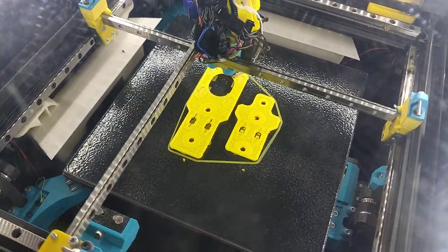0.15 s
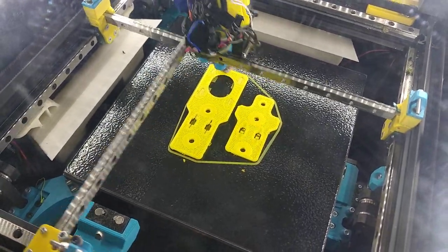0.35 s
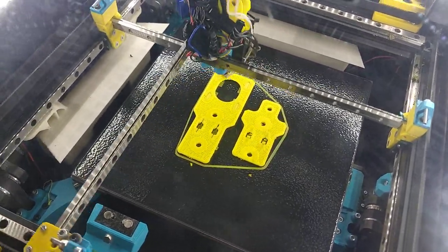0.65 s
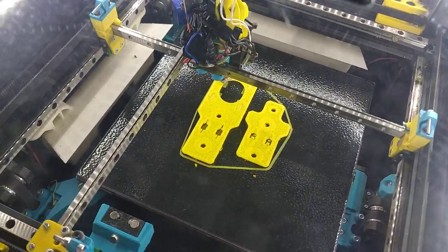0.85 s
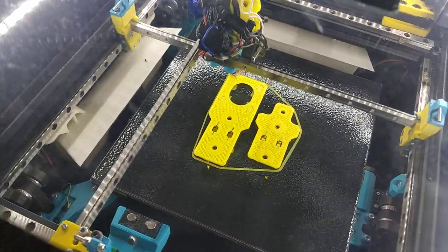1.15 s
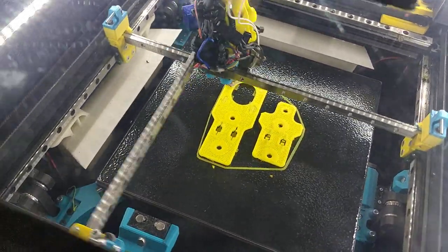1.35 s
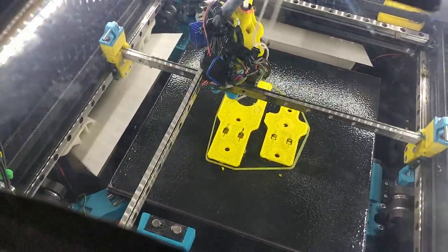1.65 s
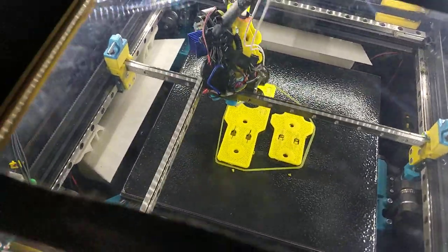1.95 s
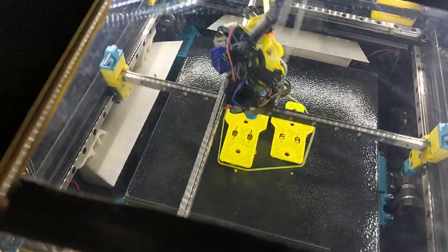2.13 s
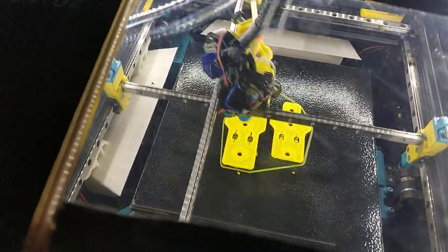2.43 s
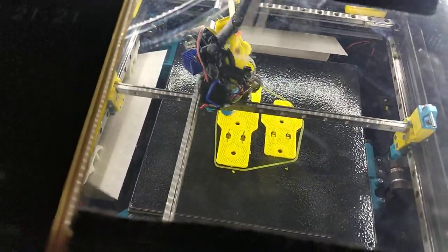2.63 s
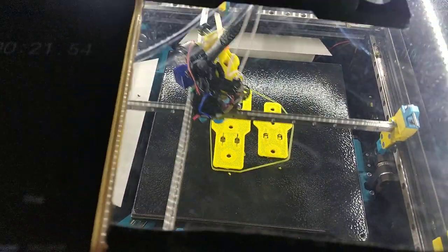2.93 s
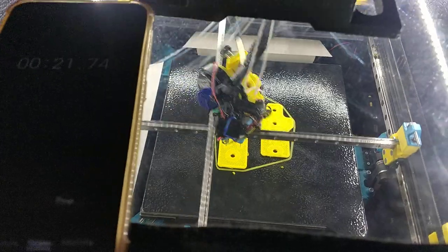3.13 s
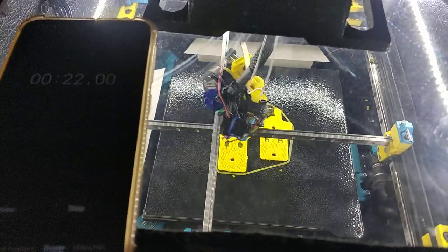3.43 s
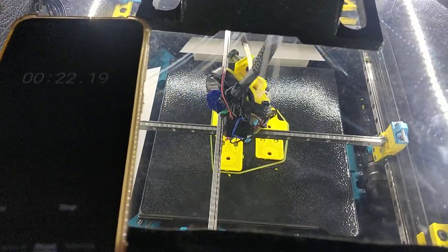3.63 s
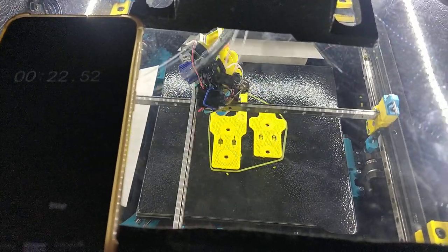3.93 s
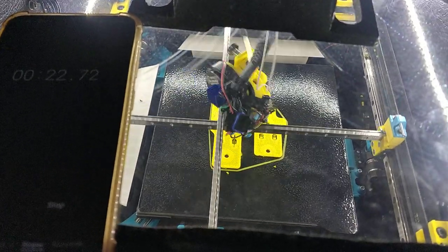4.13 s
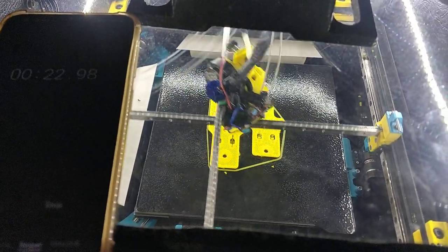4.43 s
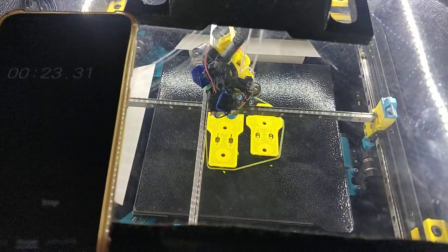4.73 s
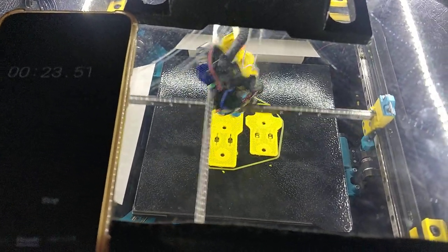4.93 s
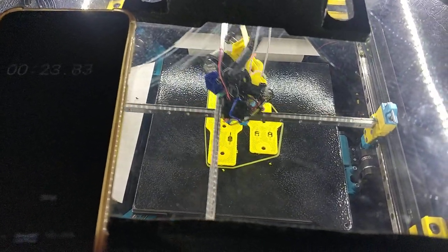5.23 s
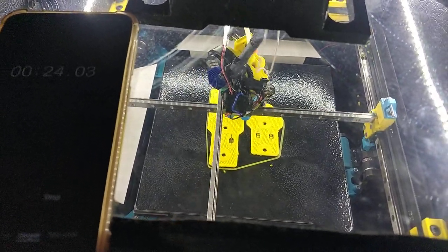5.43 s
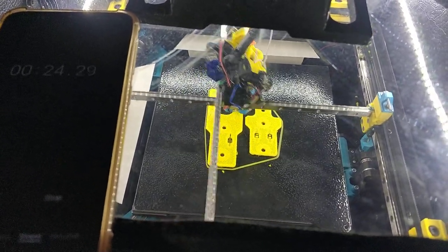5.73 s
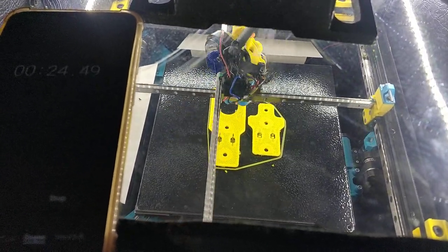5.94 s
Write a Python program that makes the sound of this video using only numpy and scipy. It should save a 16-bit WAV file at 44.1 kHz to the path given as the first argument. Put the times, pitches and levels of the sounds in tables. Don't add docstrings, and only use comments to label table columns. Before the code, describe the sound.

A fast 3D printer up close: low wavering frame hum, rapid thudding gantry jerks, drumming panel, faint hiss and ticks, ending in harder plastic raps.

```python
import sys
import numpy as np
from scipy import signal
from scipy.fft import rfft, irfft
from scipy.io import wavfile
from scipy.ndimage import uniform_filter1d

SR = 44100
rng = np.random.default_rng(int(sys.argv[2]) if len(sys.argv) > 2 else 0)


def boost(x):
    u = np.asarray(x, float) / 20
    return 10 ** u


def waveform_to_disk(signal):
    frames = np.transpose(np.atleast_2d(signal))
    scaled = np.clip(frames, -1, 1) * 32767
    samples = np.round(scaled).astype(np.int16)
    wavfile.write(sys.argv[1], SR, samples)


N = 268128
TIME_S = np.arange(N) / SR

# [peak_s, level_db]
FRAME_ROCKS = [(-.04, -30), (.12, -38), (.25, -38), (.36, -33.5), (.48, -31.5), (.69, -33), (.8, -32),
               (.91, -34), (1.03, -35), (1.14, -30.5), (1.25, -34), (1.44, -30.5), (1.55, -29),
               (1.76, -39.5), (1.95, -28.5), (2.2, -38.5), (2.34, -30.5), (2.62, -35.5), (2.7, -48),
               (2.91, -37.5), (3.05, -37), (3.14, -36), (3.45, -35), (3.72, -37), (3.88, -38), (4.0, -40.5),
               (4.25, -40.5), (4.4, -44), (4.76, -40.5), (4.94, -41), (5.05, -36), (5.2, -35.5),
               (5.4, -35.5), (5.57, -31.5), (5.66, -48), (5.8, -38), (5.97, -35.5), (6.05, -36)]
# [time_s, pitch_hz]
FRAME_PITCH_CURVE = [(0.0, 54.25), (0.52, 55.77), (0.68, 56.13), (1.22, 56.4), (1.4, 53.5), (1.6, 55.4),
                     (1.72, 53.3), (1.86, 56.5), (2.0, 55.56), (2.7, 56.4), (2.85, 59.25), (3.2, 59.3),
                     (3.4, 55.1), (3.61, 57.35), (5.15, 56.8), (5.38, 51.83), (5.57, 51.4), (5.71, 54.2),
                     (6.08, 54.6)]
# [time_s, effort_db]
HEAD_TRAVEL = [(0.0, 0), (.57, 1), (.63, -4), (.76, -1.5), (.9, -1), (1.56, 2), (1.83, -1), (2.08, 1),
               (2.6, 0.5), (3.6, -2.5), (3.89, 1), (4.06, -5), (4.3, -0.5), (4.66, -2), (5.21, 0.5),
               (5.28, -4), (5.59, -1), (6.08, 3)]
# [frequency_hz, density_db_per_hz]
AIR_SPECTRUM = [(15, -33), (25, -9), (57, 2), (80, -17), (120, -23), (165, -7.5), (234, -16), (324, -6),
                (402, -8.5), (1000, -25), (1280, -27.5), (5070, -41.5), (7800, -63.5), (9170, -61.5),
                (12300, -42), (15700, -98)]
# [frequency_hz, level_db]
BLADE_LINES = [(266, -57), (440, -62), (500, -60), (988, -60.5), (1525, -81), (1665, -70), (3820, -80)]
MAINS_BUZZ = {11: -67, 12: -72, 13: -74, 20: -80, 21: -77, 22: -78, 130: -90, 135: -88, 137: -91}
# [start_s, peak_db, pitch_hz]
PANEL_SHOVES = [(0.107, -58, 318), (0.204, -50, 320), (0.362, -36.5, 342), (0.408, -31.5, 317),
                (0.518, -33, 328), (0.684, -27.5, 311), (0.756, -33, 330), (1.017, -30.5, 337),
                (1.094, -28, 303.5), (1.224, -40, 310), (1.277, -21, 314), (1.37, -33, 333),
                (1.412, -26, 319), (1.48, -36, 328.5), (1.536, -49, 342), (1.578, -30, 330),
                (1.756, -30, 326), (1.803, -28.5, 327.6), (1.877, -24.5, 316.7), (1.935, -28.5, 296),
                (1.979, -45, 328), (2.044, -25, 335), (2.112, -21.5, 325), (2.325, -23.5, 321.7),
                (2.419, -36, 333), (2.541, -38, 316.5), (2.734, -29.5, 340), (2.821, -27.5, 324.4),
                (2.94, -43, 304.6), (3.052, -33, 354), (3.125, -29.5, 316), (3.275, -32.5, 320.5),
                (3.414, -27.5, 310.5), (3.475, -31.5, 310), (3.627, -34, 340), (3.793, -25.5, 327.3),
                (4.081, -45, 342.5), (4.372, -31.5, 332), (4.632, -30, 321), (4.708, -25.5, 316),
                (4.794, -28.5, 326), (4.849, -31, 326), (4.938, -24.5, 326), (5.004, -27, 322.5),
                (5.088, -53, 316), (5.175, -39, 303), (5.216, -60, 332.6), (5.317, -28, 341.3),
                (5.415, -28, 304), (5.492, -30, 309), (5.588, -33, 308), (5.645, -29.5, 336.4),
                (5.844, -27, 325), (5.971, -28.5, 305)]
# [start_s, peak_db, pitch_hz, lower_part_db]
BALL_TICKS = [(0.074, -41, 11400, -20), (1.003, -35.5, 11770, -18), (1.25, -39.5, 12400, -2),
              (1.6341, -55, 13400, -5), (1.896, -41, 12400, 5), (1.9813, -40, 13600, -9),
              (2.326, -41, 13600, -18), (2.4192, -38, 12900, -18), (2.6376, -47, 13500, -7),
              (2.8219, -41, 13400, -18), (3.312, -42.5, 10700, -5), (3.4188, -35.5, 12200, 20.5),
              (5.234, -43, 11100, 25), (5.5949, -44, 12500, 23)]
# [start_s, peak_db, pitch_hz]
RAIL_SCRAPES = [(0.1087, -48, 5040), (0.14, -46, 5130), (0.2583, -54, 5030), (0.4554, -48, 5000),
                (0.5571, -49, 5220), (0.7457, -48, 4620), (0.7696, -49.5, 5250), (0.8614, -53, 5180),
                (0.9525, -50, 5040), (1.1104, -54, 5330), (1.2191, -52, 5200), (1.4373, -63, 4740),
                (2.1031, -48, 4560), (2.4204, -46, 4380), (2.483, -59, 4750), (2.611, -55, 4480),
                (2.6913, -50, 4610), (2.833, -50, 4600), (3.676, -50, 4470), (3.8018, -58, 4950),
                (3.8571, -56, 4840), (5.0923, -51, 5400), (5.1864, -47, 4740), (5.2129, -49, 4430),
                (5.595, -49, 5350), (5.7937, -51, 4420), (5.828, -45, 4610), (6.0169, -46, 4710)]
# [start_s, peak_db]
SOFT_KNOCKS = [(.132, -40), (.366, -39), (.461, -41), (.493, -42), (.58, -38), (.788, -57), (1.285, -41),
               (1.336, -44), (1.439, -43), (1.491, -51), (1.554, -39), (1.611, -42), (1.749, -46),
               (1.925, -44), (2.01, -37.5), (2.069, -41), (2.105, -42), (2.185, -41), (2.287, -42),
               (2.341, -36.5), (2.415, -56), (2.538, -50), (2.643, -42), (2.819, -41), (2.906, -35.5),
               (3.075, -37.5), (3.164, -38.5), (3.181, -45), (3.199, -46), (3.396, -34.5), (3.425, -36),
               (3.446, -49), (3.472, -41), (3.487, -32), (3.691, -43), (3.828, -51), (3.888, -39),
               (4.23, -40), (4.287, -41), (4.413, -51), (4.716, -37.5), (4.755, -38), (4.96, -39),
               (5.031, -42), (5.057, -55), (5.167, -36.5), (5.642, -38), (5.807, -49)]
# [start_s, peak_db]
HARD_RAPS = [(5.41, -38), (5.444, -38), (5.486, -50), (5.51, -36), (5.543, -31.5), (5.571, -45),
             (5.599, -29), (5.821, -33), (5.8613, -38), (5.918, -35), (5.932, -33), (5.971, -35),
             (6.009, -35.5), (6.028, -32.5), (6.041, -34)]
# [frequency_hz, level_db, t60_s]
DULL_MODES = [(635, 14, 0.015), (792, 15.5, 0.012), (957, -4.5, 0.078)]
# [frequency_hz, level_db, t60_s]
BRIGHT_MODES = [(1050, 10, 0.014), (1645, 3.5, 0.021), (1504, 0.5, 0.021), (2800, -10, 0.014)]
# [start_s, peak_db, pitch_hz]
BEAM_JERKS = [(0.289, -36, 172), (.5, -33, 182), (0.579, -34, 174), (0.714, -29, 160), (0.787, -22, 175.3),
              (0.826, -29, 149), (1.006, -30, 190), (1.044, -31, 172), (1.084, -38, 171),
              (1.222, -25.5, 186), (1.369, -42, 180.2), (1.444, -25, 186.4), (1.538, -23, 176.6),
              (1.601, -39, 197.6), (1.646, -29, 201), (1.804, -29, 178), (1.903, -23, 173),
              (1.979, -20, 195), (2.017, -15.5, 188.4), (2.073, -17, 187), (2.348, -18.5, 180),
              (2.465, -31.5, 173.4), (2.536, -33, 182.4), (2.594, -25.5, 198), (2.649, -21.5, 186.4),
              (2.865, -32, 180), (2.912, -22, 188.3), (2.98, -35, 173), (3.083, -20, 185),
              (3.169, -19, 187.6), (3.314, -31, 193), (3.405, -22.5, 181.9), (3.43, -21, 182.3),
              (3.483, -19, 185), (3.694, -28.5, 199.6), (3.771, -30, 186), (3.89, -25.5, 184.6),
              (4.152, -34, 158), (4.27, -30.5, 190), (4.762, -25.5, 193), (4.965, -27.5, 192.5),
              (5.061, -29, 193), (5.12, -29.5, 203), (5.172, -20.5, 187.3), (5.316, -34, 188),
              (5.387, -25, 204.5), (5.464, -27, 181.5), (5.524, -28, 166.5), (5.601, -25, 192),
              (5.649, -23.5, 183), (5.741, -33, 184.6), (5.806, -27, 188), (5.863, -30, 183),
              (5.91, -28.5, 185.4), (5.99, -32, 172.6)]
# [pitch_ratio, level_db, t60_s]
BEAM_PAIR = [(.83, -8, 0.084), (1.17, -12, 0.091)]
# [start_s, peak_db, pitch_hz]
LINK_CLACKS = [(1.2174, -44, 3660), (1.2727, -44.5, 3870), (1.852, -48, 3670), (1.8657, -44, 3376),
               (1.8968, -38, 3410), (1.921, -42, 3370), (1.949, -44, 3680), (2.56, -46, 3810),
               (2.6088, -45.5, 3360), (2.822, -44, 3760), (3.1934, -51, 3216), (3.674, -44, 3320),
               (3.8551, -48, 3880), (5.0913, -57, 4050), (5.1863, -47, 3390), (5.6325, -42.5, 3950),
               (5.8262, -48, 3280), (5.932, -46, 3000), (6.0284, -45, 2997), (5.919, -46, 2700),
               (6.042, -48, 2800)]
# [frequency_hz, likeness_0_to_1]
PORT_LIKENESS = [(60, 0.98), (130, 0.95), (290, 0.91), (640, 0.68), (1400, 0), (3000, 0)]
# [frequency_hz, left_minus_right_db]
PORT_LEAN = [(60, 2.5), (200, .1), (380, 1.5), (700, .1), (4400, -1.1), (8100, .6), (10000, 5), (13000, 11)]

ROCK_RISE_S, ROCK_T60_S, ROCK_REST_DB = 0.053, 0.85, -52.5
LATE_ROCK = (5.89, -36.5)
SWAY_HZ, SWAY_DB = 46, -8
BUZZ_DB, BUZZ_SLOPE = -45, 1.22
AIR_DB, MAINS_HZ = -41.5, 100
BLADE_FADE_DB_S = 1.1
BELT_DB, RATTLE_DB, RAIL_DB = -50, -63.5, -70.5
RATTLE_SLOPE, RAIL_SLOPE = 1, 0.65
HEAT_DB_S, HEAT_S = 2.5, 4.72
JOLT_DB, JOLT_T60_S = 5, 0.076
PANEL_HZ, RAP_PANEL_DB = 333, -4
TICK_T60_S = 0.052
SNAP_S, SNAP_DB = 5.0283, -34
SCRAPE_T60_S, SCRAPE_DB = 0.11, -4
SOFT_BRIGHT_DB, HARD_BRIGHT_DB = -35, 8
SOFT_BRIGHT_SLOPE, HARD_BRIGHT_SLOPE = -0.51, -0.41
CRACK_DB, CRACK_T60_S = -15, 0.022
CONTACT_S = .0006
POP_S, POP_DB, POP_HZ = .2266, -12.5, 5.0
JERK_UPPER_DB = -7


def on_log(table, hz):
    f, v = np.transpose(table)
    return np.interp(np.log(np.maximum(hz, 1)), np.log(f), v)


def on_time(table):
    s, value = np.transpose(table)
    return np.interp(TIME_S, s, value)


def walk(rate):
    k = int(SR / rate)
    held = np.repeat(rng.standard_normal(N // 50), k)[:N]
    return 1.287 * uniform_filter1d(uniform_filter1d(held, k), k)


def hiss(hz, octaves):
    f = np.maximum(np.arange(N // 2 + 1) * SR / N, 1)
    bell = np.exp(-(np.log2(f / hz) / octaves) ** 4)
    mid, side = irfft(rfft(rng.standard_normal((2, N))) * bell, N)
    alike = np.clip(on_log(PORT_LIKENESS, f), 0, 1)
    mid = irfft(rfft(mid) * np.sqrt(1 + alike), N)
    side = irfft(rfft(side) * np.sqrt(1 - alike), N)
    both = np.array([mid + side, mid - side])
    return both / np.sqrt(np.mean(both.mean(axis=0) ** 2))


def tone(hz, db):
    turns = np.cumsum(hz + np.zeros(N)) / SR + rng.random()
    return np.sqrt(2) * boost(db) * np.sin(2 * np.pi * turns)


def decay(t, t60):
    return np.exp(-np.log(1000) * t / t60)


def ring(hz, t60, rise=0.00062):
    t = np.arange(int(.4 * SR)) / SR
    return (1 - np.exp(-t / rise)) * decay(t, t60) * np.sin(2 * np.pi * hz * t)


def band(x, order, low_hz, high_hz):
    return signal.sosfilt(signal.butter(order, [low_hz, high_hz], "band", fs=SR, output="sos"), x)


def add(out, s, sound, pan_db=0., lag=0):
    for side, sign in enumerate((1, -1)):
        i = max(int(s * SR) + side * lag, 0)
        n = min(len(sound), N - i)
        out[side, i:i + n] += sound[:n] * boost(sign * pan_db / 2)


def frame():
    hz = on_time(FRAME_PITCH_CURVE)
    power = boost(2 * ROCK_REST_DB)
    for s, db in [*FRAME_ROCKS, LATE_ROCK]:
        t = TIME_S - s
        power = power + boost(2 * np.where(t < 0, db + 20 * t / ROCK_RISE_S, db - 60 * t / ROCK_T60_S))
    db = 10 * np.log10(power)
    line = tone(hz * (1 + 0.013 * walk(20)), db)
    skirt = boost(db - 9) * hiss(42, 0.33)
    sway = tone(SWAY_HZ * (1 + 0.029 * walk(10)), db + SWAY_DB + 2.2 * walk(4.25))
    hand = boost(db - 10.0) * hiss(54, 0.13)[0] * np.array([[1], [-1]])
    slow_db = uniform_filter1d(db, size=SR // 4)
    buzz = boost(BUZZ_DB + BUZZ_SLOPE * (slow_db + 36.0)) * hiss(116.3, 0.44)
    return line + skirt + sway + hand + buzz


def chamber():
    out = 0
    for hz in 30 * 2 ** np.arange(0, 9.1, .5):
        band_db = on_log(AIR_SPECTRUM, hz) + 10 * np.log10(hz)
        out = out + boost(band_db + 1.98 * walk(9.9)) * hiss(hz, 0.32)
    out = out * boost(AIR_DB) / np.sqrt(np.mean(out ** 2))
    for hz, db in BLADE_LINES:
        fade_db = (hz < 1000) * BLADE_FADE_DB_S * (TIME_S - 2.5)
        out = out + tone(hz * (1 + 0.003136 * walk(4)), db + 0.27 * walk(4.76) - fade_db)
    for k, db in MAINS_BUZZ.items():
        out = out + tone(k * MAINS_HZ, db + 0.28 * walk(1.1))
    return out


def jolt():
    kicks = np.zeros(N)
    for s, db, _ in BEAM_JERKS:
        kicks[int(s * SR)] = boost(0.64 * (db + 19.5))
    return signal.lfilter([1], [1, -decay(1 / SR, JOLT_T60_S)], kicks)


def travel():
    effort_db = on_time(HEAD_TRAVEL)
    jolt_db = JOLT_DB * jolt()
    shake_db = 1.1 * walk(90) + 1.02 * walk(14)
    heat_db = HEAT_DB_S * np.maximum(TIME_S - HEAT_S, 0)
    belts = boost(4.5) * hiss(173.0, 0.36) + boost(6.5) * hiss(231, 0.75)
    belts = belts + hiss(576, 0.62) + boost(-4.5) * hiss(903, 0.44)
    belts = belts * boost(BELT_DB + effort_db + 0.78 * jolt_db)
    rattle = hiss(2640, 0.99) + boost(-5.5) * hiss(5010, 0.2) + boost(-1.0) * hiss(1310, 0.5)
    rattle = rattle * boost(RATTLE_DB + RATTLE_SLOPE * effort_db + shake_db + 0.4 * jolt_db)
    rail = hiss(14800, 0.47) + boost(-4) * hiss(6320, 0.44)
    rail = rail * boost(RAIL_DB + RAIL_SLOPE * effort_db + heat_db + shake_db + jolt_db)
    return belts + rattle + boost(4.0) * rail


def panel():
    out = boost(-47.0 + 3.8 * on_time(HEAD_TRAVEL) + 0.21 * walk(3.5)) * hiss(329.3, 0.072)
    raps = [(s, db + RAP_PANEL_DB, PANEL_HZ) for s, db in HARD_RAPS]
    for s, db, hz in [*PANEL_SHOVES, *raps]:
        add(out, s - .006, boost(db + 7.0) * ring(hz, 0.17, 0.03), .3)
    return out * boost(walk(70))


def ticks():
    out = np.zeros((2, N))
    t = np.arange(3000) / SR
    shape = (1 - np.exp(-t / 0.0024)) * decay(t, TICK_T60_S)
    for s, db, hz, low_db in BALL_TICKS:
        grit = rng.standard_normal(len(t))
        wide = 0.085 + 0.0044 * max(low_db, 0)
        high = band(grit, 2, hz * (1 - wide), min(hz * (1 + wide), 15500))
        low = boost(low_db - 22) * band(grit, 2, 4900, 9600)
        add(out, s, boost(db) * (high + low) * shape, 2.5, lag=9)
    snap = ring(14200, 0.0033, .0001) + 0.73 * ring(12500, .003, .0001)
    add(out, SNAP_S, boost(SNAP_DB + 2) * snap)
    add(out, SNAP_S + .0018, boost(SNAP_DB - 10) * snap)
    return out


def scrapes():
    out = np.zeros((2, N))
    t = np.arange(3000) / SR
    shape = (1 - np.exp(-t / 0.0018)) * decay(t, SCRAPE_T60_S)
    for s, db, hz in RAIL_SCRAPES:
        puff = band(rng.standard_normal((2, len(t))), 2, 0.888 * hz, 1.12 * hz) * shape
        i = int(s * SR)
        n = min(len(t), N - i)
        out[:, i:i + n] += boost(db + SCRAPE_DB) * puff[:, :n] / np.abs(puff.mean(axis=0)).max()
    return out


def knocks(blows, bright_db, slope):
    out = np.zeros((2, N))
    fade = decay(np.arange(900) / SR, CRACK_T60_S)
    for s, db in blows:
        detune = 1 + .025 * rng.standard_normal(7)
        crack = band(rng.standard_normal(900), 3, 700, 2000) * fade
        dull = sum(boost(g) * ring(f * k, t60) for (f, g, t60), k in zip(DULL_MODES, detune))
        bright = sum(boost(g) * ring(f * k, t60, CONTACT_S) for (f, g, t60), k in zip(BRIGHT_MODES, detune[3:]))
        body = 1.05 * ring(460, 0.067, 0.0018)
        both = dull + boost(bright_db + slope * (db + 34.0)) * bright + body
        add(out, s + 0.00108, boost(db + 9.0) * both / np.abs(both).max(), 1.1, lag=-8)
        add(out, s + 0.00104, boost(db + CRACK_DB + 0.12 * bright_db + 13) * crack)
    return out


def pop():
    step = 1. * (TIME_S > POP_S)
    thump = boost(POP_DB) * signal.lfilter([.27], [1, -.73], step)
    for leak_hz in (POP_HZ, 1.2):
        thump = signal.lfilter(*signal.butter(1, leak_hz, "high", fs=SR), thump)
    edge = np.zeros((2, N))
    add(edge, POP_S, boost(POP_DB - 19) * (ring(12000, .002, .0001) + ring(14800, .002, .0001)))
    return thump + edge[0]


def jerks():
    out = np.zeros((2, N))
    upper = ring(257, 0.056, 0.012) + 0.43 * ring(415, 0.049, 0.0052)
    for s, db, hz in BEAM_JERKS:
        beam = ring(hz, 0.12, 0.017) + boost(JERK_UPPER_DB) * upper
        for (ratio, level_db, t60), m in zip(BEAM_PAIR, rng.uniform(-1, 1, 2)):
            beam = beam + np.sign(m) * boost(level_db + 3.0 * m) * ring(ratio * hz, t60, 0.013)
        add(out, s - .006, boost(db + 7.5) * beam)
    return out * boost(walk(45))


def links():
    out = np.zeros((2, N))
    for s, db, hz in LINK_CLACKS:
        clack = ring(hz, 0.0088) + ring(1.08 * hz, 0.0094) + 0.71 * ring(2930, 0.015, 0.0023)
        add(out, s + .0005, boost(db + 4) * clack, lag=3)
    return out


def notches(x, patchy_db, hz, octaves):
    f, _, z = signal.stft(x, SR, nperseg=512)
    field = uniform_filter1d(rng.standard_normal(z.shape[1:]), size=9, axis=1) * 3
    field = np.minimum(field, .9) - 1.5 * np.maximum(-.2 - field, 0)
    reach = np.exp(-(np.log2((f + 1) / hz) / octaves) ** 2)[:, None]
    gain = boost(patchy_db * field * reach)
    gain = gain / np.sqrt(np.mean(gain ** 2, axis=1, keepdims=True))
    return signal.istft(z * gain, SR, nperseg=512)[1][:, :N]


def scene():
    steady = notches(travel() + chamber(), 11, 8200, 1.0)
    soft = knocks(SOFT_KNOCKS, SOFT_BRIGHT_DB, SOFT_BRIGHT_SLOPE)
    hard = knocks(HARD_RAPS, HARD_BRIGHT_DB, HARD_BRIGHT_SLOPE)
    return frame() + steady + panel() + ticks() + scrapes() + soft + hard + jerks() + links()


def low_pass(x):
    return signal.sosfilt(signal.butter(12, 15790, fs=SR, output="sos"), x)


def record(dry):
    hz = np.arange(N // 2 + 1) * SR / N
    lean = boost(on_log(PORT_LEAN, hz) * np.array([[.5], [-.5]]))
    ports = rfft(dry) * 2 * lean / lean.sum(axis=0)
    ports = ports + rfft(pop()) * np.array([[0], [1]])
    return low_pass(irfft(ports * (hz < 15790), N))


dry = scene()
out = record(dry)
waveform_to_disk(out)
```